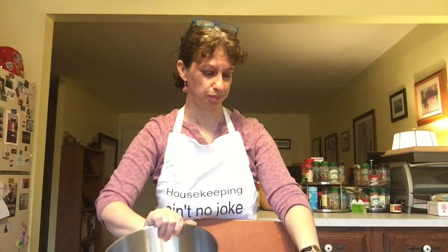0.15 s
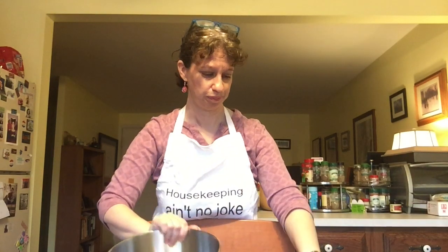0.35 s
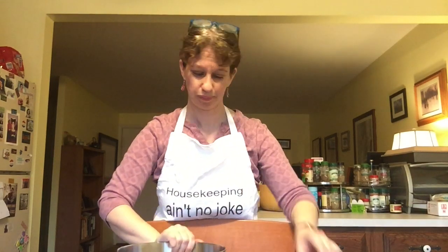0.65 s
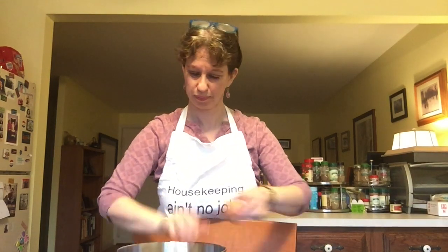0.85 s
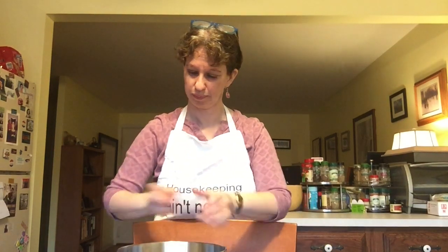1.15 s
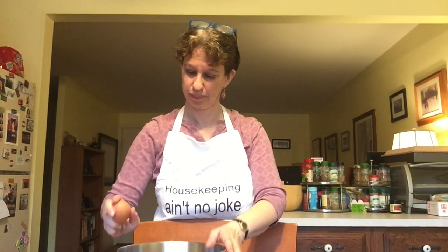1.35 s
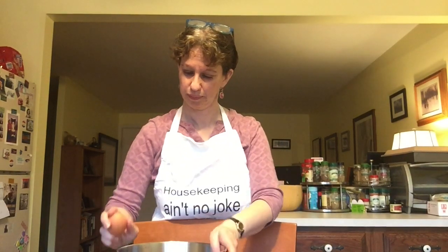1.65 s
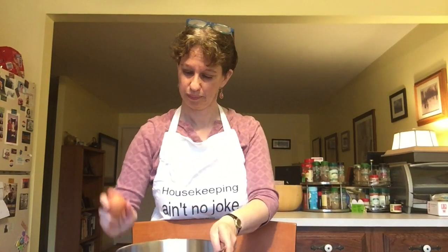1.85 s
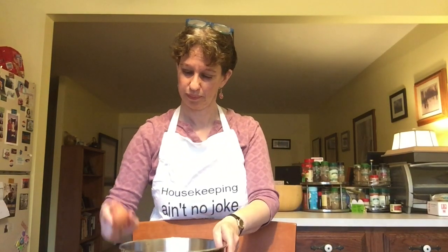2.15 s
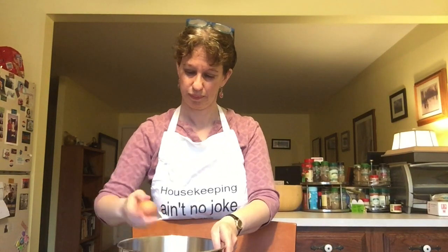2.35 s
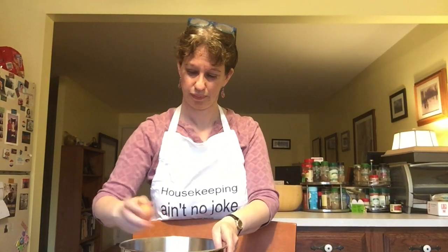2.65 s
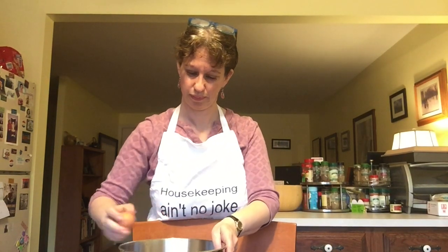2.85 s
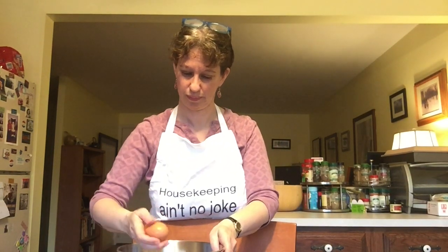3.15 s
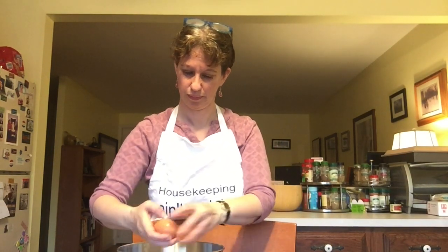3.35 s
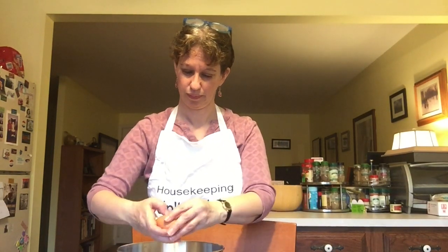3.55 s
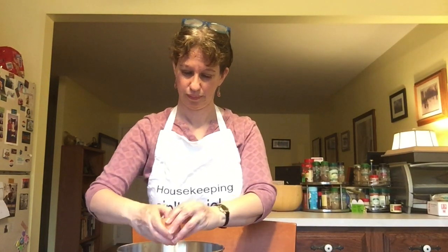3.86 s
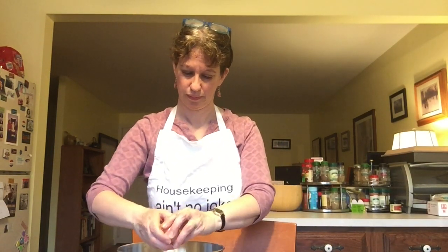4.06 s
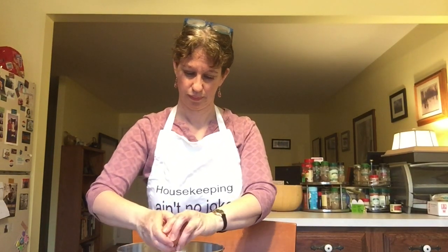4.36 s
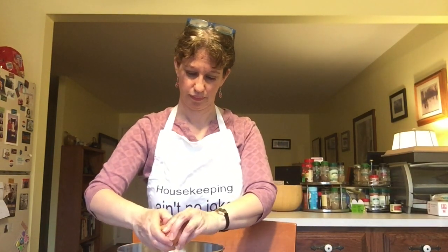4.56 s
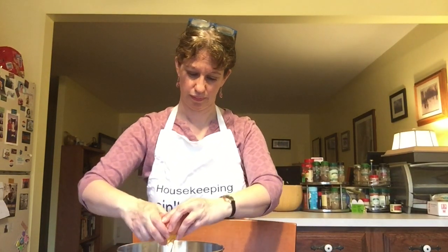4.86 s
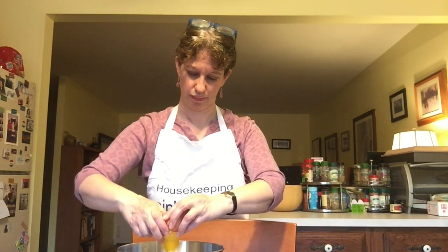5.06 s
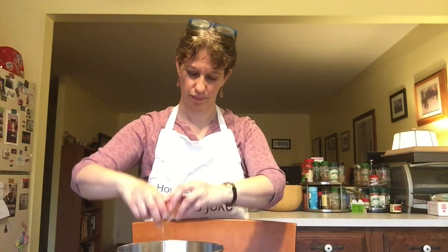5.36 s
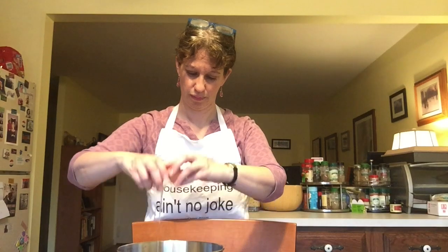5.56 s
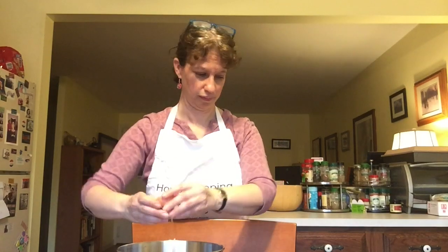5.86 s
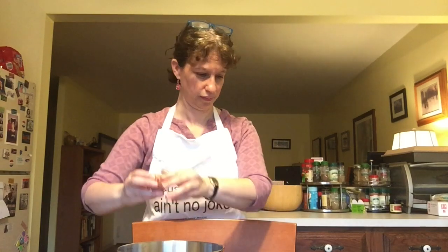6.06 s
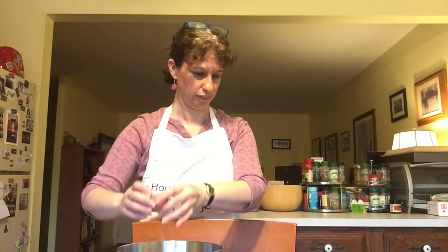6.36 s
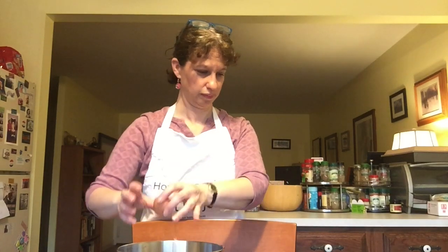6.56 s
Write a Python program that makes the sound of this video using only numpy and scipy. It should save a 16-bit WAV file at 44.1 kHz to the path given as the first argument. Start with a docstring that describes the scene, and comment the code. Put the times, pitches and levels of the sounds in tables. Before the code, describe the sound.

A steel bowl is set down on a wooden table with two ringing thuds. An egg is tapped sharply on the rim, then knocked again with a heavier thud. Fingers rub faintly, the shell splits in tiny snaps, and the egg plops softly into the bowl before the empty halves are crushed together. It is heard from beside the table in a kitchen with a short echo and a faint appliance hum.

```python
"""In a kitchen, an appliance hums while a steel bowl is set down on a wooden table: the wood thuds
and the steel rings. An egg is tapped on the rim, then knocked harder. Fingers rub and squeak,
thumbs split the shell in runs of tiny snaps, and the wet egg pops and plops into the bowl.
The empty halves are crushed together. Hard walls add a short echo."""
import sys
import numpy as np
from scipy import signal
from scipy.fft import rfft, irfft, next_fast_len
from scipy.io import wavfile
from scipy.ndimage import uniform_filter1d

SR = 44100
rng = np.random.default_rng(int(sys.argv[2]) if len(sys.argv) > 2 else 0)


def wav_record(signal):
    """Record a signal, one row per channel, as 16-bit PCM in the file named by sys.argv[1]."""
    frames = np.transpose(np.atleast_2d(signal))
    bounded = np.clip(frames, -1, 1)
    # unit amplitude maps onto the largest positive 16-bit level
    quanta = np.round(bounded * 32767).astype(np.int16)
    wavfile.write(sys.argv[1], SR, quanta)


N = 296484
AGE = np.arange(SR) / SR  # seconds since a sound began

# the bowl's tones: f/Hz, ring time/s, level hit on the base/dB, level hit on the rim/dB, change if held/dB
BOWL_TONES = [(581, .8, -30, -8, 0), (953, .7, -30, -4.5, 0), (1653, .85, -10, -25, -13),
              (1712, .7, -16, -10, -6), (1765, .5, -11, -1.5, -8), (1960, .2, -4, -12, -6),
              (2340, .24, -16, -6, 0), (2711, .72, -12, -15, -10), (2757, .45, -13, -11, 0),
              (3973, .36, -9, -18, -16), (4021, .42, -12, -24, -14), (4193, .47, -9, -14, -9),
              (4270, .38, -15, -6, -5), (4422, .27, 1, -6, 0), (4480, .17, -3, -10, -2),
              (4648, .12, -18, 3, 0), (5609, .32, -5, -20, -17), (5920, .27, -11, -9, -5),
              (6380, .25, -14, -7, 0), (7830, .2, -17, -4, 0), (8446, .22, -15, -10, 0)]
# the bright sound of eggshell: f/Hz, level/dB
SHELL_SPECTRUM = [(150, -50), (600, -21), (1200, -18.5), (2500, -6.5), (4300, -0.5), (8000, 3.5),
                  (12000, 1), (16000, 4.5)]
# how long the kitchen echoes: f/Hz, fade time/s
ROOM_FADE = [(250, 0.16), (2000, 0.36), (7000, 0.34), (16000, 0.26)]


def undb(db):
    """Turn decibels into a factor to multiply by."""
    return 10 ** (np.asarray(db) / 20)


def along(points, hz):
    """Read between the rows of a (frequency, value) table, with octaves evenly spaced."""
    f, value = np.transpose(points)
    return np.interp(np.log(hz + 1), np.log(f), value)


def colour(x, points, tilt_db=0):
    """Filter a sound by a (frequency, level) table, adding tilt_db per octave around 500 Hz."""
    size = 2 * next_fast_len(len(x))
    hz = np.arange(size // 2 + 1) * SR / size
    db = along(points, hz) + tilt_db * np.log2(np.maximum(hz, 100) / 500)
    # fold the filter in time so that nothing sounds before the hit
    cepstrum = irfft(np.log(undb(db)))
    cepstrum[1:size // 2] *= 2
    cepstrum[size // 2 + 1:] = 0
    return irfft(rfft(x, size) * np.exp(rfft(cepstrum)))[:len(x)]


def unit(x):
    """Scale to an energy of one."""
    return x / np.sqrt(np.sum(x ** 2))


def at_level(x, db):
    """Give a short sound the energy of 25 ms at this level."""
    return unit(x) * undb(db) * np.sqrt(.025 * SR)


def fade(t60):
    """A smooth fade that is 60 dB down after t60 seconds."""
    return np.exp(-np.log(1000) * AGE / max(t60, 1e-4))


def damped(t60, db_per_s):
    """The shorter ring time left after an extra loss."""
    return 60 / (60 / t60 + db_per_s)


def wander(rate, size=N):
    """Smooth random drift, heading somewhere new `rate` times a second."""
    hold = int(SR / rate)
    steps = np.repeat(rng.standard_normal(size // hold + 1), hold)
    return uniform_filter1d(uniform_filter1d(steps, hold), hold)[:size]


def add(track, s, x):
    """Mix x into the track at s seconds."""
    i = int(s * SR)
    track[i:i + len(x)] += x[:N - i]


def ring(tones):
    """A struck thing rings in fading tones: rows of f/Hz, level/dB, ring time/s."""
    return sum(rng.choice([-1, 1]) * undb(db) * fade(t60) * np.sin(2 * np.pi * hz * AGE)
               for hz, db, t60 in tones)


def echoes(fade_times):
    """Many echoes blur into noise in which each octave fades at its own speed."""
    hz = np.arange(len(AGE) // 2 + 1) * SR / len(AGE)
    octave = np.log2(np.clip(hz, 125, 16000) / 125)
    noise = rfft(rng.standard_normal(len(AGE)))
    bands = [irfft(noise * np.maximum(1 - abs(octave - k), 0)) for k in range(8)]
    return unit(sum(band * fade(along(fade_times, 125 * 2 ** k)) for k, band in enumerate(bands)))


def impact(fade_times, contact_s, direct_db):
    """A brief rough contact, followed by its echoes."""
    contact = unit(rng.standard_normal(len(AGE)) * fade(contact_s))
    return undb(direct_db) * contact + echoes(fade_times)


def kitchen(x, echo_db):
    """The sound itself, then wall echoes that build up over a few milliseconds."""
    walls = echoes(ROOM_FADE) * (1 - fade(0.005))
    return x + undb(echo_db) * signal.fftconvolve(x, unit(walls))[:len(x)]


def appliance(waver_db=-1.0, drift=.25, air_db=-58):
    """A motor hums at twice the mains frequency, with faint higher tones over moving air."""
    # the motor's tones: f/Hz, average level/dB
    motor_tones = [(119.8, -54), (409, -77.5), (459, -73.5), (581, -77), (641, -71), (701, -73)]
    # the low rush of air: f/Hz, level/dB
    air_spectrum = [(25, -27.5), (50, -5.5), (85, 0), (160, 0.5), (250, -2), (450, -13.5), (700, -11.5),
                    (1100, -12.5), (1600, -18.5), (2500, -29.5), (4000, -37), (8000, -42), (16000, -46)]
    t = np.arange(N) / SR
    hum = np.zeros(N)
    for hz, db in motor_tones:
        peak = undb(db + waver_db * wander(3.2)) * np.sqrt(2)
        wobble = drift * hz / motor_tones[0][0] * wander(3)
        hum += peak * np.sin(2 * np.pi * hz * t + wobble)
    air = colour(rng.standard_normal(N), air_spectrum)
    return hum + air / air.std() * undb(air_db + 0.74 * wander(6.4))


def steel(tones, twin_db=-8, flutter_db=3.5, scatter_db=1.0):
    """The bowl is not quite round, so each tone throbs against a twin just above it."""
    out = 0
    for hz, db, t60 in tones:
        twin_hz = hz + 11 * np.sqrt(hz / 1000) * rng.uniform(.5, 1.7)
        this_hit_db = scatter_db * rng.standard_normal()
        gain = undb(this_hit_db + flutter_db * wander(110, len(AGE)))  # echoes make it flutter
        out = out + gain * ring([(hz, db, t60), (twin_hz, db + twin_db, t60)])
    return out


def knock(db, tilt_db, wood_db, held):
    """One bump thuds through the table and rings the bowl; a steadying hand shortens the ring."""
    # the thud: f/Hz, level/dB
    thud_spectrum = [(25, -51.5), (60, -19.5), (150, 5), (350, 1), (720, -1.5), (1100, -8), (1700, -9.5),
                     (2500, -18), (3500, -22.5), (4400, -22.5), (5100, -30), (8000, -25), (10000, -33),
                     (16000, -31.5)]
    # how long the thud lasts: f/Hz, fade time/s
    thud_fade = [(150, 0.35), (600, 0.31), (2000, 0.38), (8000, 0.35), (16000, 0.24)]
    # the table's tones with the bowl on it: f/Hz, level/dB, ring time/s
    wood_tones = [(160.8, 2, .33), (231.6, -3, 0.26), (344.5, -2, .26), (431, -6, 0.32), (582, -5, 0.16),
                  (707, -6.5, 0.25), (767, -7.5, 0.22), (1352, -16.5, 0.15), (1648, -9, 0.3)]
    thud = colour(impact(thud_fade, contact_s=0.011, direct_db=-8.5), thud_spectrum, tilt_db)
    bowl = steel([(hz, base_db + held * hand_db, damped(t60, db_per_s=held * 70))
                  for hz, t60, base_db, _, hand_db in BOWL_TONES])
    wood = ring([(hz, tone_db + tilt_db * np.log2(hz / wood_tones[0][0]), damped(t60, db_per_s=held * 25))
                 for hz, tone_db, t60 in wood_tones])
    wood *= 1 - fade(0.011)  # the heavy top takes a moment to get moving
    bowl_db = -10.5 + 4.5 * tilt_db - 3.5 * held  # harder, brighter bumps ring more; a held bowl less
    return at_level(thud, db) + at_level(wood, db + wood_db) + at_level(bowl, db + bowl_db)


def bowl_bumps(rebound_db=-11, rebound_tilt_db=-0.88, held_from_s=.4):
    """The bowl is set down, knocked by the egg and touched by the falling egg; each bump lands flat, or rocks
    the bowl on its base in ever weaker and duller rebounds."""
    # bumps: t/s, thud level/dB, brightness/dB per octave, wood ring over thud/dB, rock time/s (0 if flat)
    bumps = [(.143, -25, 0.47, -2.5, 0), (.599, -45.5, -6, -8, 0), (.644, -51.5, -0.3, 3, 0),
             (0.6662, -31, 0, .5, .076), (.932, -48.5, -7.5, -8, 0), (1.468, -48, -4, -4, 0),
             (1.7701, -44.5, -0.76, -4, 0), (2.9836, -26, 0.92, -6, .1247), (3.021, -42.5, 1, -2, 0),
             (5.294, -65, 1.5, -2, 0)]
    out = np.zeros(N)
    for s, db, tilt_db, wood_db, rock_s in bumps:
        for k in range(3 if rock_s else 1):
            bump = knock(db + k * rebound_db, tilt_db + k * rebound_tilt_db, wood_db, held=s > held_from_s)
            add(out, s + k * rock_s, bump)
    return out


def fingers(grain_db=4, ticks_per_s=70):
    """Skin slides over shell and steel with a faint grainy hiss, ticking where it catches."""
    # shifts of grip: middle t/s, half length/s, level/dB
    rubs = [(.525, .051, -70.5), (.858, .027, -67.5), (1.724, .054, -72), (3.52, 0.18, -80.5),
            (3.878, 0.046, -67.5), (4.4, .13, -72), (4.532, 0.027, -54.5), (5.632, 0.016, -62),
            (6.0, .08, -68), (6.436, 0.066, -69.5), (6.688, .04, -74)]
    t = np.arange(N) / SR
    pressure = sum(undb(db) * np.exp(-((t - s) / half) ** 2) for s, half, db in rubs)
    grainy_noise = rng.standard_normal(N) * undb(grain_db * rng.standard_normal(N))
    slide = colour(grainy_noise, SHELL_SPECTRUM, tilt_db=-4.5)
    catches = rng.random(N) < ticks_per_s / SR
    ticks = colour(catches * rng.standard_normal(N), SHELL_SPECTRUM)
    return kitchen(pressure * (slide / slide.std() + ticks / ticks.std()) / 2, echo_db=-2.5)


def rim_tap(shimmer_db=-7, shimmer_s=.27, shimmer_tones=45):
    """The shell snaps on the thin rim, waking the bowl's main tones and a shimmer of high ones."""
    # the egg meets the rim: t/s, snap level/dB, bowl level/dB
    egg_tap = (2.0982, -28.5, -32)
    # the bright snap: f/Hz, level/dB
    snap_spectrum = [(60, -29), (200, -5), (300, 11), (430, -9.5), (620, 2.5), (1200, -3.5), (1900, 1),
                     (3400, -11.5), (4500, -3), (5400, -6), (8000, -1), (10500, -4), (16000, -0.5)]
    # how long the snap lasts: f/Hz, fade time/s
    snap_fade = [(300, 0.17), (1500, 0.38), (7000, 0.43), (16000, 0.18)]
    s, snap_db, bowl_db = egg_tap
    snap = colour(impact(snap_fade, contact_s=.018, direct_db=-6.0), snap_spectrum)
    shimmer = ring([(hz, 0, shimmer_s) for hz in rng.uniform(3000, 14000, shimmer_tones)])
    bowl = steel([(hz, rim_db, t60) for hz, t60, _, rim_db, _ in BOWL_TONES])
    out = np.zeros(N)
    add(out, s, at_level(snap, snap_db) + at_level(shimmer, snap_db + shimmer_db) + at_level(bowl, bowl_db))
    return out


def squeaks(start_hz=3520, db=-79, length_s=0.045, fall=0.14, rough=0.044):
    """Gripping the egg makes faint, unsteady tones that slide downwards."""
    # squeak starts: t/s
    starts = [3.265, 3.372, 3.485, 3.625, 4.02]
    out = np.zeros(N)
    progress = np.minimum(AGE / length_s, 1)
    for s in starts:
        pitch = start_hz * (1 - fall * progress + rough * wander(900, len(AGE)))
        squeak = np.sin(np.pi * progress) * np.sin(2 * np.pi * np.cumsum(pitch) / SR)
        add(out, s, kitchen(at_level(squeak, db), echo_db=-10))
    return out


def fracture(run_s, steps_per_s=1300, scatter_db=5, first_db=3):
    """A crack starts with one snap and runs on in ever smaller random steps."""
    steps = (rng.random(len(AGE)) < steps_per_s / SR) * rng.choice([-1, 1], len(AGE))
    sizes = undb(scatter_db * np.clip(rng.standard_normal(len(AGE)), -2, 1))
    clicks = steps * sizes * np.exp(-AGE / max(run_s, 1e-4))
    clicks[0] = undb(first_db)
    return clicks


def pops(hz, run_s, per_s, octaves, cycles, scatter_db=4, count=70):
    """One pop and a dying run of others, each ringing for some cycles at its own pitch."""
    out = np.zeros(len(AGE))
    age = AGE[:SR // 40]
    gaps = rng.exponential(1 / per_s, count)
    chance = np.clip(rng.standard_normal((count, 2)), -2, 1.5)
    gaps[0], chance[0] = 0, (0, 1)  # the first pop comes at once, on pitch and strong
    for s, (detune, size) in zip(np.minimum(np.cumsum(gaps), .5), chance):
        f = hz * 2 ** (octaves * detune)
        pop = np.sin(2 * np.pi * f * age) * np.exp(-np.log(1000) * f * age / cycles)
        add(out, s, pop * undb(scatter_db * size) * np.exp(-s / max(run_s, 1e-4)))
    return out


def crack(db, run_s, hz, ring_db, shiver_s=0.012, shiver_db=-6):
    """The thin shell clicks and shivers as it breaks, and the freed piece rings."""
    steps = kitchen(fracture(run_s), echo_db=1.5)
    shiver = impact(ROOM_FADE, shiver_s + 4 * run_s, direct_db=-3.5)
    click = colour(unit(steps) + undb(shiver_db) * unit(shiver), SHELL_SPECTRUM)
    pings = pops(hz, run_s, per_s=600, octaves=0.17, cycles=17)
    piece = colour(kitchen(pings, echo_db=1), SHELL_SPECTRUM)
    return at_level(unit(click) + undb(ring_db) * unit(piece), db)


def shell_cracks(open_s=4.57, closed_ring_db=-10, open_ring_db=-4.5, pry_s=(4.37, 4.92), ticks=5):
    """The shell cracks, and ticks faintly as the thumbs pry; pieces ring more once the egg is open."""
    # breaks in the shell: t/s, level/dB, time the crack runs/s, pitch of the piece/Hz
    breaks = [(3.7651, -45, 0.0018, 5560), (4.094, -41, 0.013, 4440), (4.122, -43, .0068, 4800),
              (4.309, -62.5, 0.0045, 5000), (4.5506, -36.5, .0008, 4400), (4.579, -46, .001, 3020),
              (4.584, -38, .0006, 2380), (4.772, -54.5, 0.00088, 4080), (5.004, -67, .001, 12100),
              (5.0518, -65.5, .002, 6100), (5.141, -60, .0001, 4070), (5.293, -51, 0.0076, 13500),
              (5.395, -56.5, .002, 8400), (5.646, -47.5, 0.007, 5140), (5.867, -57.5, 0.025, 4430),
              (5.883, -56, 0.015, 3880), (6.055, -54, 0.0025, 14000), (6.0656, -49.5, .001, 5030)]
    out = np.zeros(N)
    for s, db, run_s, hz in breaks:
        add(out, s, crack(db, run_s, hz, closed_ring_db if s < open_s else open_ring_db))
    for s in rng.uniform(*pry_s, ticks):
        add(out, s, crack(db=-67, run_s=.003, hz=5200, ring_db=closed_ring_db))
    return out


def squelches():
    """Films of wet egg white burst on shell and steel in quick runs of tiny pops."""
    # bursting films: t/s, level/dB, middle f/Hz
    films = [(4.105, -63, 1850), (4.776, -63.5, 1790), (5.294, -60, 1488), (5.643, -59.5, 2130),
             (5.877, -58.5, 1890), (6.055, -67.5, 2450)]
    out = np.zeros(N)
    for s, db, hz in films:
        squelch = pops(hz, run_s=0.018, per_s=450, octaves=0.24, cycles=57)
        add(out, s, kitchen(at_level(squelch, db), echo_db=2.5))
    return out


def tear(start_s=4.597, db=-43.5, hz=2270, step_s=.0085, fade_db_per_s=134, jitter=.2, octaves=0.15):
    """The halves part in a quick, fading run of eight snaps that ring the hollow of the shell."""
    out = np.zeros(N)
    for k, (late, detune) in enumerate(rng.standard_normal((8, 2))):
        age = step_s * (k + jitter * late)
        pitch = hz * 2 ** (octaves * detune)
        add(out, start_s + age, crack(db - fade_db_per_s * age, run_s=0.0024, hz=pitch, ring_db=11))
    return out


def fizz(start_s=5.297, db=-46.5):
    """The white peels out of the shell in a spray of tiny high pops."""
    out = np.zeros(N)
    spray = kitchen(pops(hz=8600, run_s=0.025, per_s=840, octaves=0.09, cycles=32), echo_db=3)
    add(out, start_s, at_level(colour(spray, SHELL_SPECTRUM), db))
    return out


def plops(fade_s=0.21):
    """White and yolk land in the bowl with dull, soft bumps."""
    # lumps of egg landing: t/s, level/dB
    lumps = [(5.327, -44), (5.363, -43), (5.408, -51), (5.531, -54.5)]
    # the deep sound of one lump: f/Hz, level/dB
    lump_spectrum = [(20, -6), (45, 5), (110, 8), (170, 4.5), (300, -12.5), (900, -38), (4000, -46)]
    out = np.zeros(N)
    for s, db in lumps:
        plop = colour(rng.standard_normal(len(AGE)) * fade(fade_s), lump_spectrum)
        add(out, s, at_level(plop, db))
    return out


def scene():
    """All the sounds, heard from one spot by the table."""
    hard_sounds = bowl_bumps() + rim_tap() + shell_cracks() + tear()
    soft_sounds = fizz() + squelches() + squeaks() + fingers() + plops()
    return (hard_sounds + soft_sounds + appliance())[None]


def record(dry, rumble_hz=33, top_hz=15950):
    """Filters cut the deepest rumble and the highest treble."""
    dry = signal.sosfilt(signal.butter(4, rumble_hz, "highpass", fs=SR, output="sos"), dry)
    return signal.sosfilt(signal.ellip(10, .2, 80, top_hz, fs=SR, output="sos"), dry)


dry = scene()
out = record(dry)
wav_record(out)
```